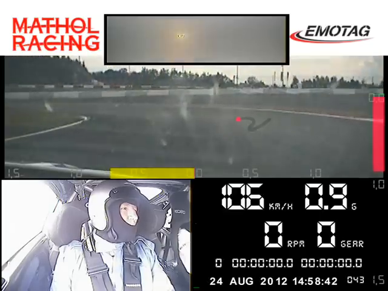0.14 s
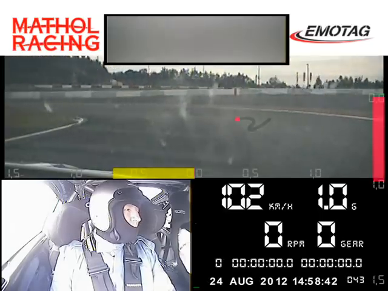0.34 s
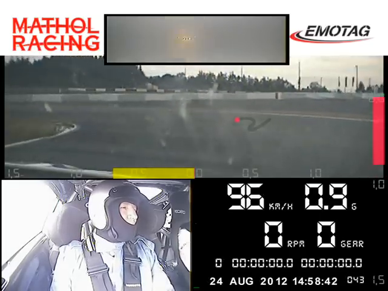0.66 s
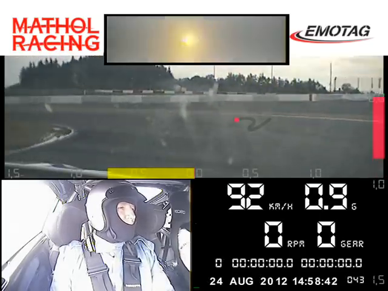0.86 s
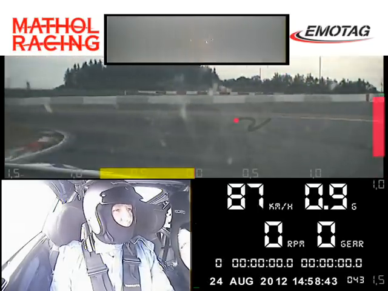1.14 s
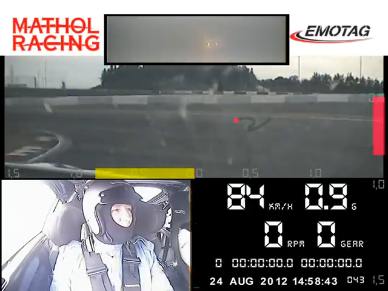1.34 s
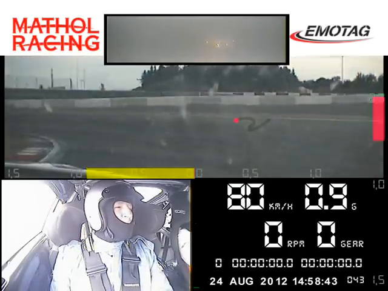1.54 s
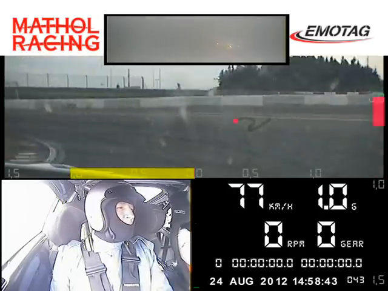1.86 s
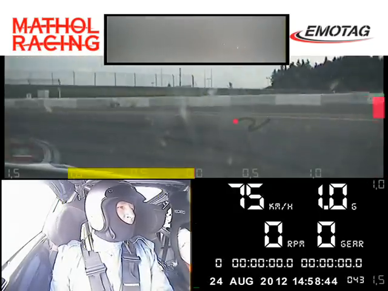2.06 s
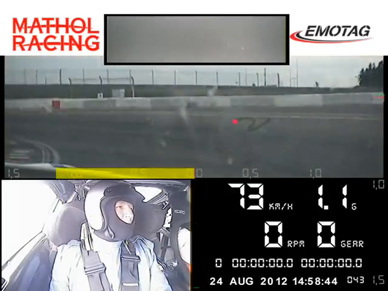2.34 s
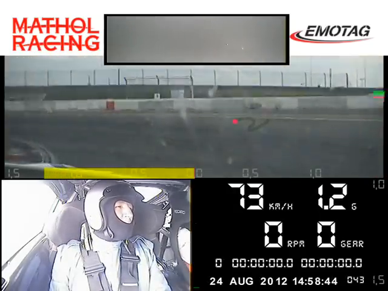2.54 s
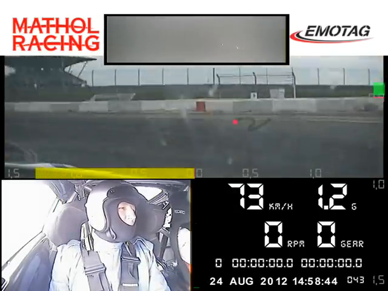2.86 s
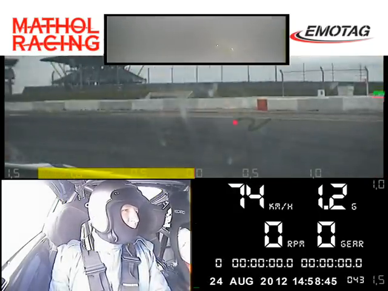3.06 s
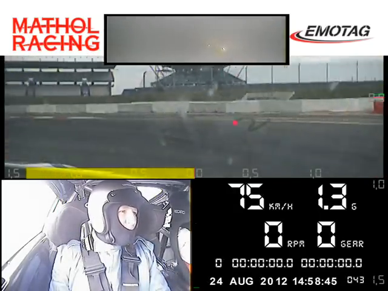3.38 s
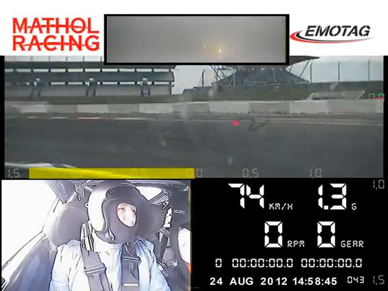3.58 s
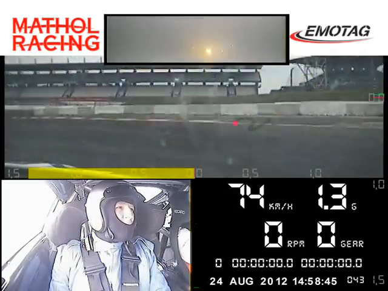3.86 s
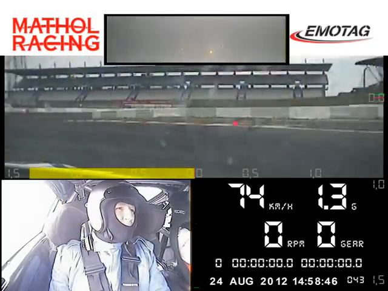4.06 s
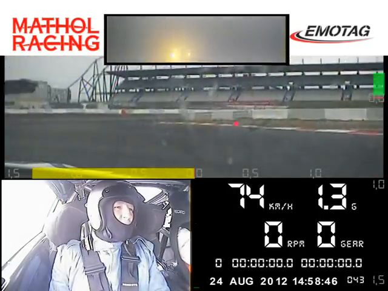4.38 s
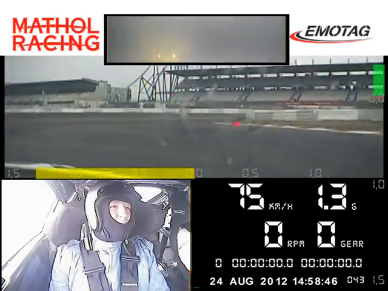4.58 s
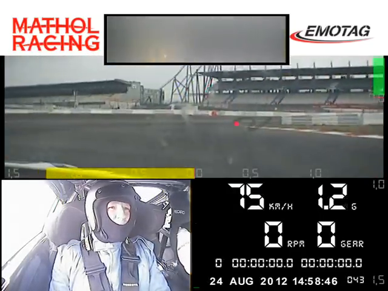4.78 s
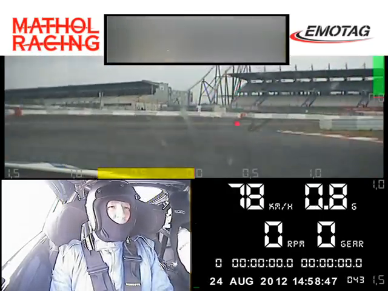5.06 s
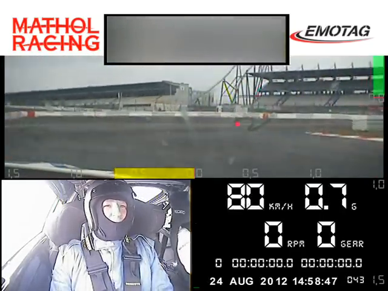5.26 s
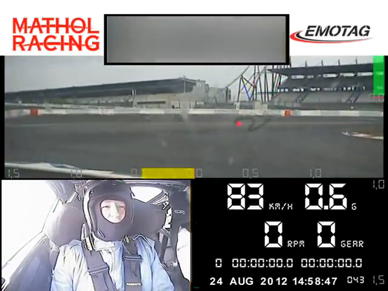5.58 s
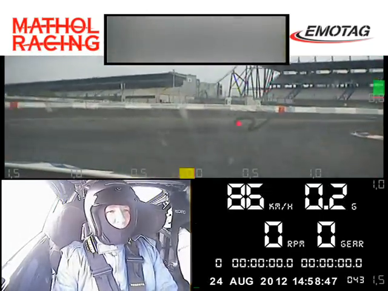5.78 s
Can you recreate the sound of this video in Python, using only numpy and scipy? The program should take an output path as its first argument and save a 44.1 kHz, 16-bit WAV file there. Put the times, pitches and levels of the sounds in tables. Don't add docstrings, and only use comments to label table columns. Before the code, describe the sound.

Raw onboard V8: throttle blip, crackling overrun, a quieter corner with faint gear whine, then a distorted full-throttle surge and closing pops.

```python
import sys
import numpy as np
from scipy import signal
from scipy.io import wavfile
from scipy.ndimage import uniform_filter1d

SR = 44100
rng = np.random.default_rng(int(sys.argv[2]) if len(sys.argv) > 2 else 0)


def voltage_ratio(decibels):
    exponent = np.asarray(decibels, float) / 20
    return 10 ** exponent


def wav_out(sig):
    wavfile.write(sys.argv[1], SR, np.round(np.clip(np.atleast_2d(sig).T, -1, 1) * 32767).astype(np.int16))


N = 261072
HOP = 128

# [t/s, exhaust level/dB, throttle/0-1]
DRIVE = [(0, -40.5, 0.09), (.5, -41, 0.04), (1.2, -39.5, 0.05), (2.2, -41, .01), (2.38, -37.5, .04),
         (2.5, -30, 0.21), (2.75, -27, .3), (3.05, -30, 0.15), (3.35, -38.5, 0.08), (3.75, -37.5, 0.03),
         (4.15, -39, 0.03), (4.28, -30, 0.15), (4.6, -28.5, 0.47), (4.97, -29, .55), (5.18, -29, 1),
         (5.74, -30, 0.89), (5.82, -34.5, 0), (5.92, -37, 0.01)]
# [t/s, cycle rate f/Hz]
SPEED = [(.1, 41.7), (.23, 44.8), (.45, 45.3), (.65, 48.2), (.89, 45.8), (1.5, 39.9), (2.26, 37.3),
         (2.51, 38.7), (2.88, 39.8), (3.3, 39.9), (4.0, 38.8), (4.48, 40.4), (4.76, 41.5), (4.96, 41.3),
         (5.13, 42.2), (5.62, 46.2), (5.72, 46.3), (5.8, 45.3)]
# [t/s, engine braking/0-1, brake pedal eased off/0-1]
OVERRUN = [
    (.3, 0, 0),
    (.45, .17, 0),
    (1.28, .46, 0),
    (1.42, .98, 0),
    (1.66, .98, 0),
    (1.76, .98, 1),
    (2.1, .98, 1),
    (2.17, .2, 0),
    (2.42, 0, 0),
]
# [multiple of the cycle, level/dB throttle shut, level/dB full load]
ORDERS_DB = [(2, -32, -10.5), (4, -11, -19.5), (7, -4, -11), (10, -10.5, -19.5), (11, -15, -11),
             (12, -18, -9.5), (13, -21, -4), (14, -12, -9), (15, -30, -16), (16, -16, -5.5),
             (17, -28.5, -5.5), (18, -28.5, -6), (19, -15, -10.5), (20, -18.5, -8.5), (21, -17.5, -6),
             (22, -28, -10), (23, -20.5, -7.5), (24, -18.5, -10.5), (25, -18, -1), (26, -31, -0.5),
             (27, -19.5, -4), (28, -21.5, -6), (29, -38, -10), (30, -20.5, 1), (31, -20.5, -3.5),
             (32, -23.5, 0.5), (33, -21.5, -1), (34, -22.5, -5.5), (35, -17.5, -11), (36, -30.5, 0.5)]
# [multiple, level/dB]
BRAKING_DB = [(2, -1), (3, 18.1), (4, 8), (5, 6), (6, -2.9), (7, 16.5), (8, 8.1), (9, 1.1), (10, 4.5),
              (11, 2.5), (12, 7), (13, 22), (14, -27.5), (15, 1), (16, 15.5), (17, 10.5), (18, 4), (19, -5),
              (20, -2), (21, 15.5), (22, 11), (23, 5.5), (24, 9)]
EASED = [7, 8, 10, 11, 13, 14, 16]
EASED_DB = [1.5, -3, 4, 5.5, -8.5, 2, -3]
# [f/Hz, width/Hz, level/dB]
CABIN = [(241.7, 13.9, 26), (326, 7, -9), (409.2, 21, 25), (429.6, 24, 22.5), (532.3, 27, 21.5),
         (624.5, 5.4, 16), (667, 59, 11.5), (785, 8.8, 9), (883.6, 7.9, 12), (1026.6, 52, 12.5),
         (1228.5, 18.8, 14.5), (1295.4, 16, 13), (1410, 7.9, 12), (1677, 30, 15)]
# [f/Hz, width/Hz, level/dB]
CABIN_HIGH = [(1837, 50, 13.5), (2193, 51, 7.5), (2653, 144, 11), (2980, 150, 10.5), (3610, 520, 8)]
BOOMS = [3, 5, 6, 8, 9]
# [throttle/0-1, then rms level/dB of each booming multiple]
BOOM_DB = [(0, -40.5, -16.5, -15, -33, -28.5), (.1, -41.5, -19.5, -16, -20.5, -32.5),
           (.26, -31.5, -16, -17.5, -16.5, -23.5), (.43, -33, -10, -20.5, -26, -14.5),
           (.56, -30, -9.5, -18, -23.5, -12), (.75, -34, -5, -32, -14.5, -7),
           (.92, -30, -10.5, -22, -14, -8.5), (.99, -29.5, -25.5, -27, -16.5, -7)]
# [rms level/dB under braking, how early braking takes over, share of the resonances
BOOM_BRAKING = [(-28.5, 0.39, 0.012), (-32.5, 2.5, 1.37), (-32, 0.34, 0.79), (-20.5, 4.9, 0.01),
                (-35, 0.58, 0.01)]
REVVING_DB = [2, 3, -2, 12, 16.5]
# [t/s, peak level/dB, ring f/Hz]
POPS = [(0.255, -13.5, 252), (0.27, -7, 449), (0.988, -10.5, 240), (1.028, -11.5, 226), (1.1, -12, 258),
        (1.155, -8.5, 394), (1.201, -10.5, 379), (1.229, -8, 239), (1.249, -11, 375), (1.334, -3.5, 248),
        (1.36, -9, 403), (2.159, -10.5, 232), (2.197, -18.5, 219), (2.308, -14, 217), (5.855, -13, 228),
        (5.885, -12.5, 226)]
# [f/Hz, level/dB per Hz]
ROAR = [(59, -31), (100, 0.5), (179, -15.5), (236, 6.5), (289, -4.5), (527, 0.5), (781, -12.5),
        (1240, -3.5), (1520, -9), (6000, -31.5), (7800, -72), (13200, -120)]
# [f/Hz, level/dB per Hz]
HISS = [(1180, -34), (2000, 0), (2120, -2), (2340, -3.5), (2720, -2.5), (4670, -11), (7270, -14),
        (11100, -22.5), (12000, -25), (15600, -60), (22000, -120)]
# [f/Hz, level/dB per Hz]
ROAD = [(8.8, -65), (15, -13), (49, -18.5), (150, -19.5), (234, -8.5), (280, -14), (544, -20), (848, -25.5),
        (1510, -29), (1690, -27.5), (3000, -60), (3900, -76), (6600, -120)]
# [t/s, rms level/dB]
WHINE = [
    (2.9, -67),
    (3.2, -44),
    (3.7, -42.5),
    (4.15, -42.5),
    (4.352, -58),
]
# [t/s, peak level/dB]
TICKS = [
    (1.3494, -37),
    (1.9994, -45),
    (2.7394, -36),
    (2.8694, -39),
    (3.3742, -34),
    (3.7933, -32),
    (4.5994, -38),
]
# [f/Hz, level/dB]
APART = [(60, -24), (120, -32.5), (220, -38.5), (430, -40), (830, -22.5), (1610, -31), (3100, -28),
         (5990, -23.5), (11600, -26)]
# [f/Hz, share of blocks/0-1]
APART_SHARE = [(100, .8), (1400, .7), (3000, .45), (6000, .35), (12000, 0.1)]

BLIP_S, SWELL_S, EBB_S, STAB_S, BLIP_DB, BLIP_THROTTLE = 0.284, 0.22, 0.073, 0.022, 8, 0.72
REVVING_S, REVVING_WIDTH_S = 0.21, 0.065
BRAKING_LEVEL_DB, BRAKING_LOAD, SHUT_LOAD, LOAD_PER_THROTTLE = -3, 0.32, 0.12, 1.283
STEADY, FLAT_OUT, COASTING, POPPING, POP_S = 0.05, 0.32, 0.17, 0.2, 0.035
UPPER_SHUT_DB, UPPER_FULL_DB, SHOULDER_DB, SHOULDER_ORDERS, EVEN_DB = -30, -13, 11, 4.6, -2.5
KICK_DB, KICK_HZ, SHARPEN, PIVOT_DB, BOOM_PEAK_DB = 20, 14.2, 0.13, 13, 26
ROAR_DB, ROAR_PER_LEVEL, ROAR_THROTTLE_DB, ROAR_BLIP_DB = -42, 0.89, 7.5, 11.5
ROAR_SURGE_DB, ROAR_EBB_S = 1.2, 0.46
HISS_DB, HISS_THROTTLE_DB, ROAD_DB, TEETH = -51, 29, -31.5, 43


def evened(x):
    return x / np.sqrt(np.mean(abs(x) ** 2) + 1e-20)


def follow(rows, t):
    s, *columns = np.transpose(rows)
    return [np.interp(t, s, c) for c in columns]


def read(points, hz):
    f, value = np.transpose(points)
    return np.interp(np.log(hz + 1), np.log(f + 1), value)


def drift(shape, frames):
    a, b = rng.standard_normal((2,) + shape)
    smooth = signal.windows.hann(int(frames) + 3)[None]
    return evened(signal.fftconvolve(a + 1j * b, smooth, "same", axes=1))


def cycles():
    return np.cumsum(follow(SPEED, np.arange(N) / SR)[0]) / SR


def near_pop(t, s):
    return np.exp(-0.5 * ((t - s - 0.02) / POP_S) ** 2)


def controls(t):
    level_db, throttle = follow(DRIVE, t)
    braking = follow(OVERRUN, t)[0]
    swell = np.exp(-abs(t - BLIP_S) / np.where(t < BLIP_S, SWELL_S, EBB_S))
    throttle = throttle + BLIP_THROTTLE * np.exp(-0.5 * ((t - BLIP_S) / STAB_S) ** 2)
    popping = np.minimum(sum(near_pop(t, s) for s, db, hz in POPS), 1)
    level_db = level_db + BLIP_DB * swell + BRAKING_LEVEL_DB * braking ** 2
    return level_db, throttle, braking, swell, popping


def cabin(hz):
    modes = CABIN + CABIN_HIGH
    detune = [2 * (hz - f) / width for f, width, db in modes]
    powers = [voltage_ratio(db) ** 2 / (1 + d ** 2) for d, (f, width, db) in zip(detune, modes)]
    power = 1 + sum(powers)
    return power, -sum(p * np.arctan(d) for p, d in zip(powers, detune)) / power


def noise(spectrum, ring, patchy_db):
    hz = np.fft.rfftfreq(1024, 1 / SR)
    a, b, patches = rng.standard_normal((N // 256 + 5, 513, 3)).T
    patches = evened(uniform_filter1d(uniform_filter1d(patches, 10, axis=0), 10, axis=1))
    colour = voltage_ratio(read(spectrum, hz)) * cabin(hz)[0] ** (ring / 2)
    z = (a + 1j * b) * colour[:, None] * voltage_ratio(patchy_db * patches)
    return signal.istft(z, nperseg=1024, noverlap=768)[1][:N]


def microphone_hiss():
    return voltage_ratio(-52.5) * rng.standard_normal(N)


def road():
    level_db = controls(np.arange(N) / SR)[0]
    return voltage_ratio(ROAD_DB + 0.28 * (level_db + 50.5)) * evened(noise(ROAD, 0.056, 2.7))


def rattles():
    out, t = np.zeros(N + 2000), np.arange(2000) / SR
    high = signal.butter(2, 6500, "high", fs=SR)
    bursts = signal.lfilter(*high, rng.standard_normal((len(TICKS), 2000)))
    envelope = (1 - np.exp(-t / 0.003)) * np.exp(-t / 0.016)
    for (s, db), burst in zip(TICKS, bursts):
        out[round(s * SR):][:2000] += voltage_ratio(db - 5) * burst * envelope
    return out[:N]


def gears():
    level = voltage_ratio(np.interp(np.arange(N) / SR, *np.transpose(WHINE), left=-99, right=-99))
    waver = 1 + 0.45 * drift((1, N), 3000)[0]
    return np.sqrt(2) * level * (waver * np.exp(2j * np.pi * TEETH * cycles())).real


def puffs(gap=0.43):
    turns = cycles()
    return np.exp(-(turns % 1) / 0.15) + np.exp(-((turns - gap) % 1) / 0.043)


def intake_hiss():
    throttle = controls(np.arange(N) / SR)[1]
    level = voltage_ratio(HISS_DB + HISS_THROTTLE_DB * throttle + 7)
    return level * evened(noise(HISS, 0.078, 2.2)) * evened(1 + 0.51 * puffs())


def exhaust_roar():
    t = np.arange(N) / SR
    level_db, throttle, braking, swell, popping = controls(t)
    after_blip = np.where(t < BLIP_S, swell ** 3, np.exp((BLIP_S - t) / ROAR_EBB_S))
    surge = throttle * drift((1, N), 3000)[0].real
    roar_db = ROAR_DB + ROAR_PER_LEVEL * (level_db + 40) + ROAR_THROTTLE_DB * throttle
    roar_db = roar_db + ROAR_BLIP_DB * after_blip + ROAR_SURGE_DB * surge
    return voltage_ratio(roar_db + 7) * evened(noise(ROAR, 0.54, 1.03)) * evened(1 + 0.8 * puffs())


def pops():
    out, t = np.zeros(N + 3000), np.arange(3000) / SR
    band = signal.butter(2, [700, 2600], "band", fs=SR)
    rasp = signal.lfilter(*band, rng.standard_normal((len(POPS), 3000)))
    envelope = (1 - np.exp(-t / 0.004)) * np.exp(-t / 0.031)
    for (s, db, hz), puff in zip(POPS, rasp):
        ring = np.sin(2 * np.pi * hz * t) + 0.62 * puff * np.exp(-t / 0.015)
        out[round(s * SR):][:3000] += voltage_ratio(db - 5.5) * ring * envelope
    return out[:N]


def multiples_db(k, load, braking, fall_db=0.28, scatter_db=4.5):
    known, shut_db, full_db = np.transpose(ORDERS_DB)
    shut_db = np.interp(k, known, shut_db, right=UPPER_SHUT_DB)
    full_db = np.interp(k, known, full_db, right=UPPER_FULL_DB)
    above = np.maximum(k - known[-1], 0)
    shoulder_db = (SHOULDER_DB + EVEN_DB * (-1.) ** k) * np.exp(-above / SHOULDER_ORDERS)
    scatter = scatter_db * rng.standard_normal((len(k), 1))
    beyond_db = (above > 0) * (scatter - fall_db * above + load * shoulder_db)
    braking_db = np.interp(k, np.arange(len(BRAKING_DB)) + 2.5, np.transpose(BRAKING_DB)[1], right=2.5)
    return shut_db * (1 - load) + full_db * load + beyond_db + braking * braking_db


def booms_db(t, throttle, braking, swell, power_db):
    braked_db, early, share = np.transpose(BOOM_BRAKING)[:, :, None]
    held = braking ** early
    revving = np.exp(-0.5 * ((t - REVVING_S) / REVVING_WIDTH_S) ** 2)
    driven_db = follow(BOOM_DB, throttle * (1 - swell)) + np.outer(REVVING_DB, revving)
    return (driven_db + share * (power_db - BOOM_PEAK_DB)) * (1 - held) + braked_db * held


def engine(spread=0.038, unsteady=0.0068, gap=0.39, second=0.84, ring=0.53):
    t = np.arange(N // HOP + 2) * HOP / SR
    speed_hz = follow(SPEED, t)[0]
    level_db, throttle, braking, swell, popping = controls(t)
    load = SHUT_LOAD + LOAD_PER_THROTTLE * throttle + BRAKING_LOAD * braking ** 2 + 0.52 * swell
    load = np.clip(load, 0, 1)
    lingering = np.clip(2 * uniform_filter1d(throttle, size=80) - 0.9, 0, 1)
    uneven = STEADY + FLAT_OUT * (lingering + swell)
    uneven = uneven + COASTING * 4 * braking * (1 - braking) + POPPING * popping

    first = 2
    k = np.arange(first, 92)[:, None]
    power, phase = cabin(k * speed_hz)
    power_db = 10 * np.log10(power)
    db = multiples_db(k, load, braking) + level_db
    db = db + power_db + SHARPEN * braking ** 2 * (power_db - PIVOT_DB)
    rows = np.subtract(BOOMS, first)
    db[rows] = booms_db(t, throttle, braking, swell, power_db[rows])
    db[np.subtract(EASED, first)] += np.outer(EASED_DB, follow(OVERRUN, t)[1])
    for s, pop_db, hz in POPS:
        near_ring = np.exp(-0.5 * ((k * speed_hz - hz) / KICK_HZ) ** 2)
        db = db + (KICK_DB + pop_db) * near_pop(t, s) * near_ring

    phase = ring * phase + np.angle(1j + 1j * second * np.exp(-2j * np.pi * gap * k))
    phase = phase + spread * k * rng.standard_normal((len(k), 1))
    depth = np.clip(uneven + unsteady * k, 0, 0.95) * np.where(np.isin(k, BOOMS), 0.4, 1)
    shake = 0.88 * drift(db.shape, 60) + 0.47 * drift(db.shape, 9)
    z = voltage_ratio(db) * np.sqrt(2) * np.exp(1j * phase)
    z = z * (np.sqrt(1 - depth ** 2) + depth * shake)

    at, turn = np.arange(N) / HOP, np.exp(2j * np.pi * cycles())
    out, spin = np.zeros(N), turn
    for row in z:
        spin = spin * turn
        out += (np.interp(at, np.arange(len(t)), row) * spin).real
    return out


def scene():
    background = microphone_hiss() + road() + rattles() + gears()
    mono = background + intake_hiss() + exhaust_roar() + pops() + engine()
    return np.array([mono, mono])


def starved(mono, hole_db=-82, slope_db=-4.5):
    hz, t, z = signal.stft(mono, SR, nperseg=2048, noverlap=1536)
    power = abs(uniform_filter1d(uniform_filter1d(abs(z) ** 2, size=3, axis=0), size=5, axis=1))
    limit = voltage_ratio(hole_db + slope_db * np.log2(hz / 10000 + 0.01))[:, None] ** 2
    keep = (power > limit) | (hz < 3500)[:, None]
    return signal.istft(z * keep, nperseg=2048, noverlap=1536)[1][:N]


def apart(mono, lift_db=2.5):
    hz, t, z = signal.stft(mono, SR, nperseg=2048, noverlap=1024)
    band = (np.log(1 + hz / 1500) * 14).astype(int)
    a, b = rng.standard_normal((2,) + z.shape)
    blocks = rng.random((64, len(t)))
    share = np.clip(read(APART_SHARE, hz), 0.02, 1)[:, None]
    nearby = abs(uniform_filter1d(abs(z) ** 2, 9, axis=0))
    level = np.sqrt(nearby / share) * voltage_ratio(read(APART, hz)[:, None] + lift_db)
    grain = (a + 1j * b) * level * (blocks[band] < share)
    return signal.istft(grain, nperseg=2048, noverlap=1024)[1][:N]


def band_limit(x):
    return signal.sosfilt(signal.butter(12, 12160, fs=SR, output="sos"), x)


def record(dry):
    bent = dry[0] / (1 + abs(dry[0] / 1.03) ** 6.5) ** (1 / 6.5)
    kept = starved(np.clip(bent + 0.009, -0.995, 0.995))
    mix = kept + apart(kept) * np.array([[1], [-1]])
    return band_limit(mix)


dry = scene()
out = record(dry)
wav_out(out)
```